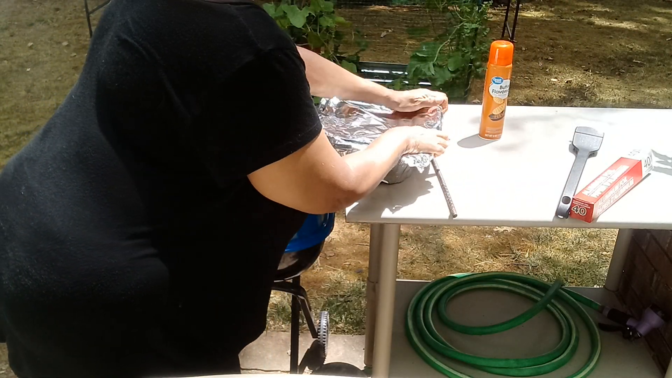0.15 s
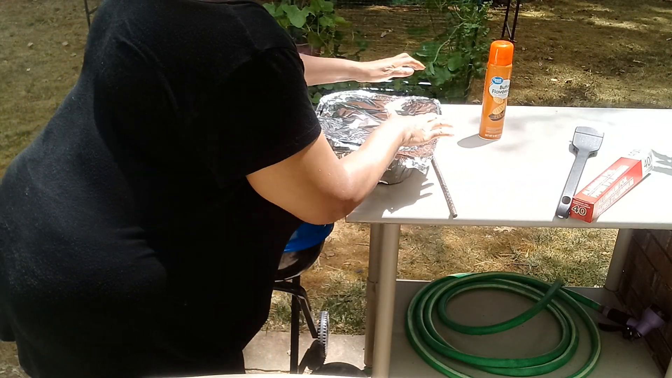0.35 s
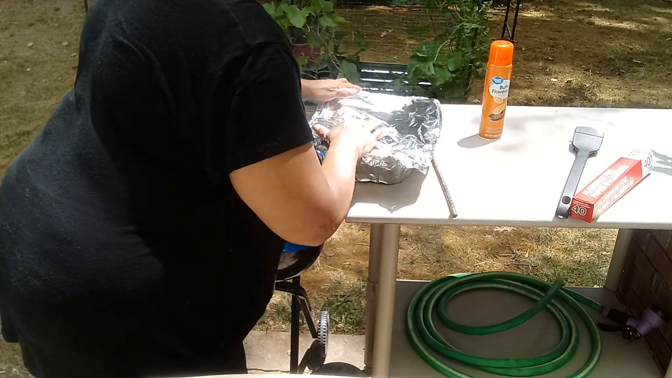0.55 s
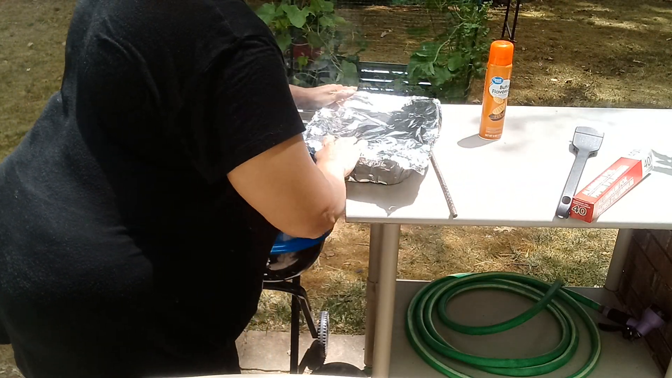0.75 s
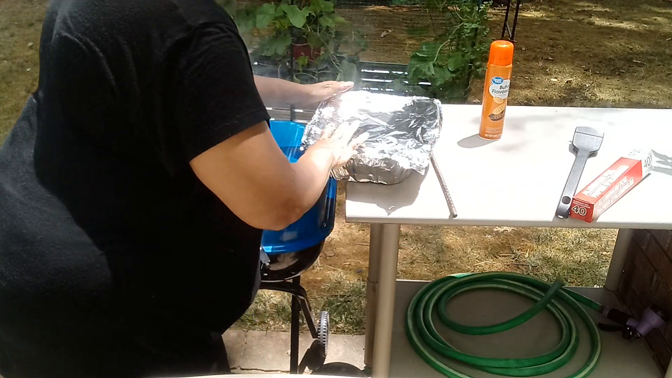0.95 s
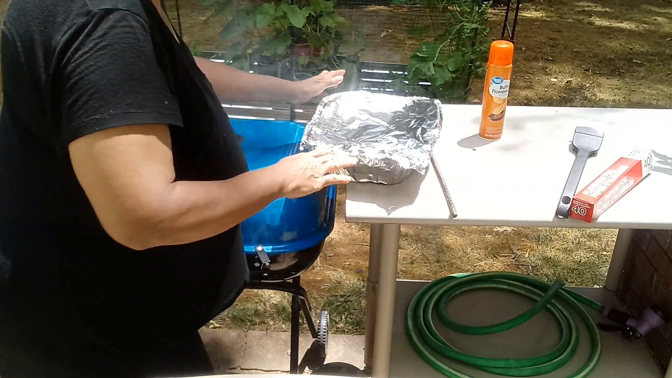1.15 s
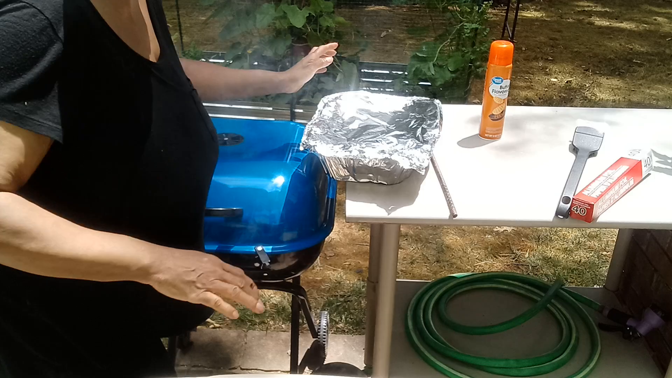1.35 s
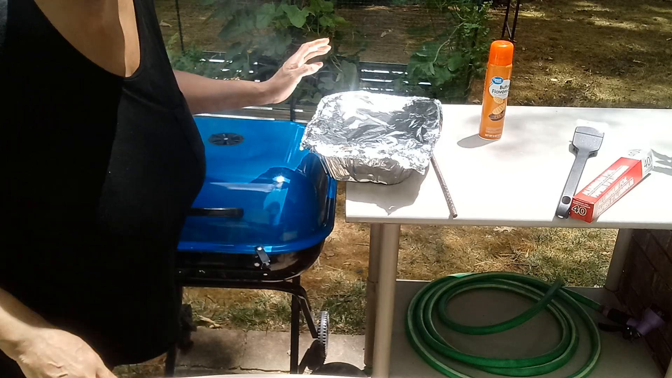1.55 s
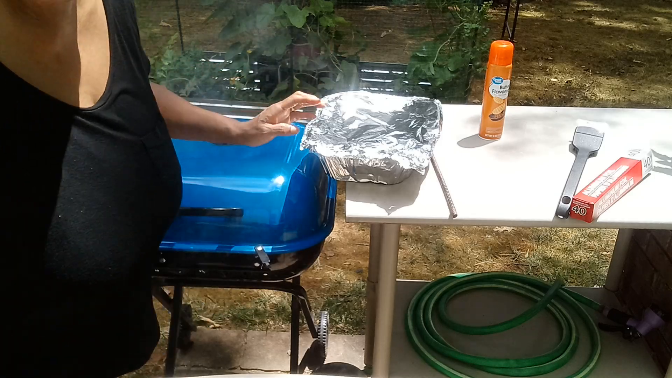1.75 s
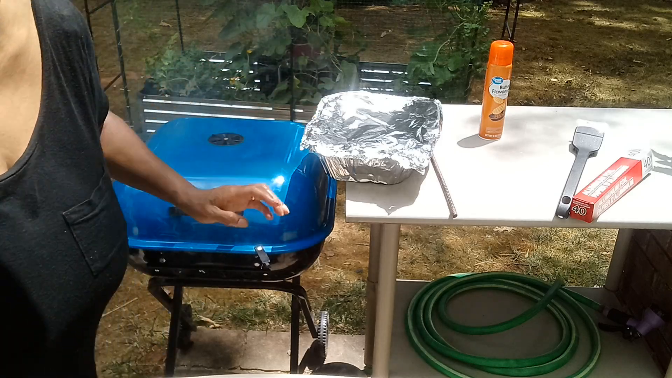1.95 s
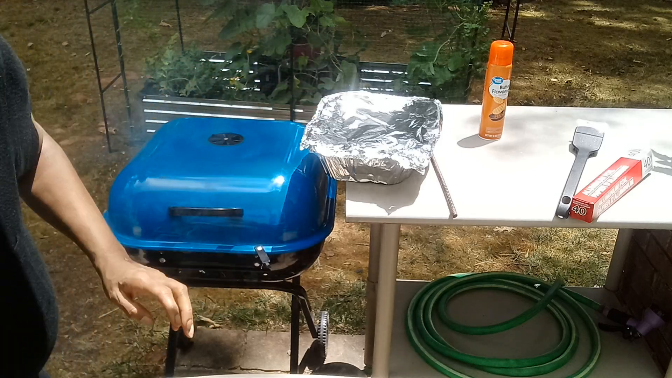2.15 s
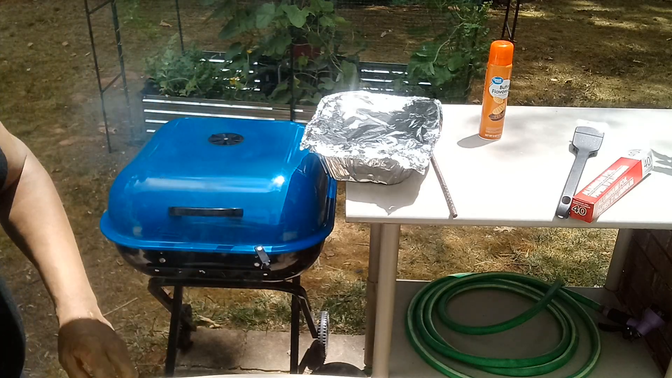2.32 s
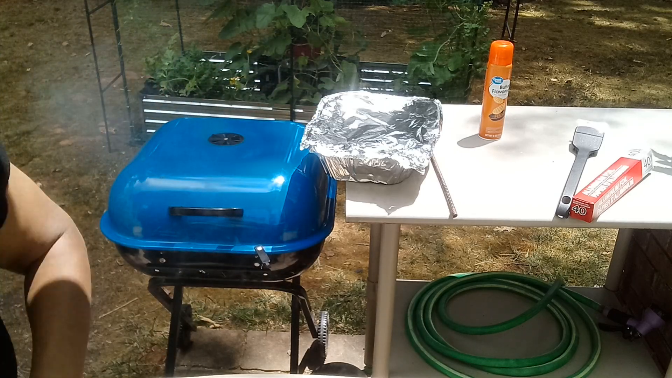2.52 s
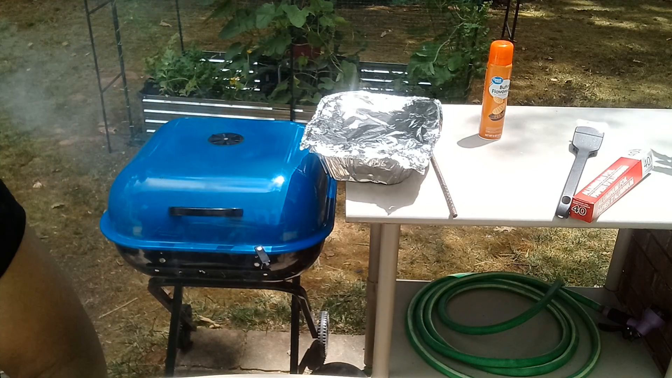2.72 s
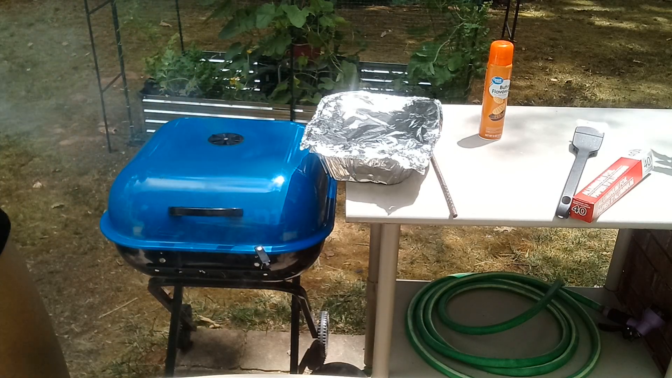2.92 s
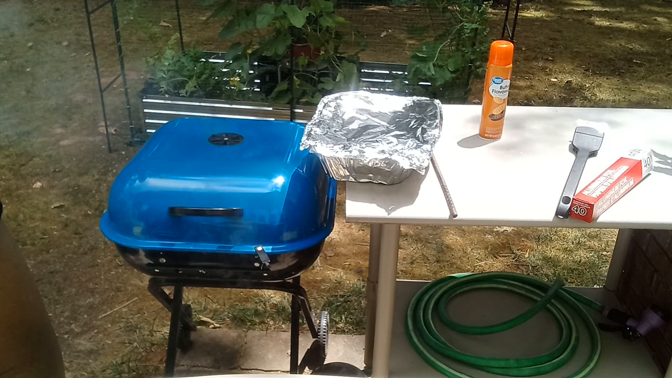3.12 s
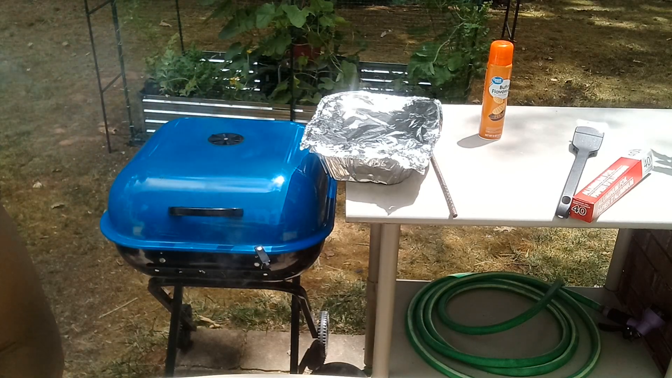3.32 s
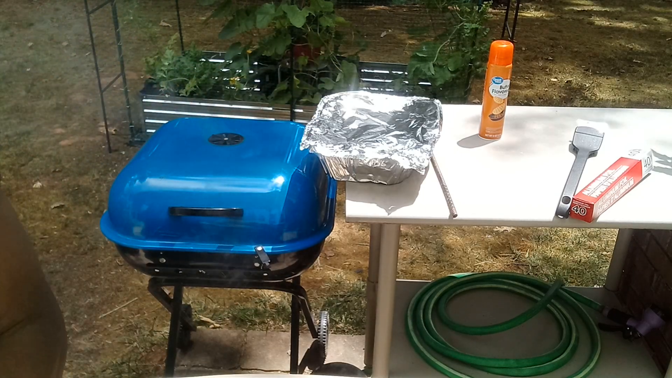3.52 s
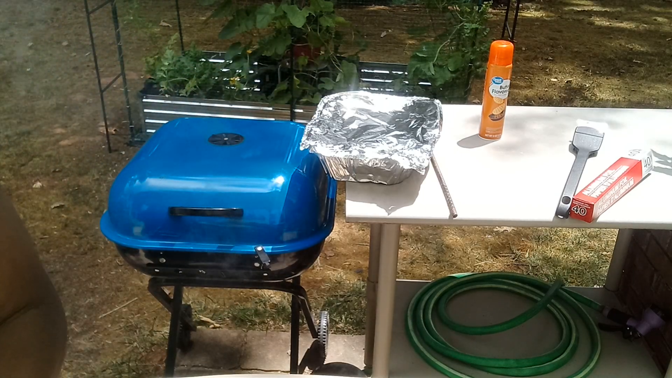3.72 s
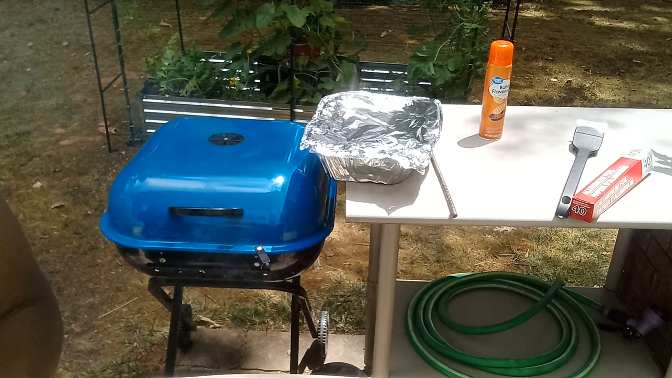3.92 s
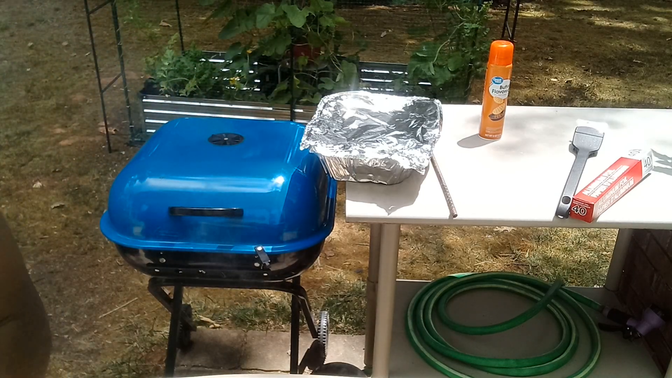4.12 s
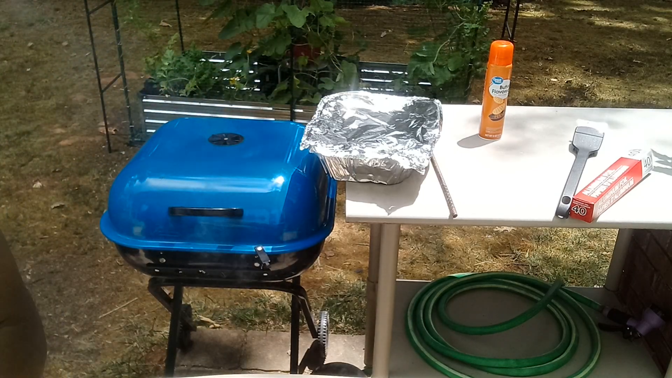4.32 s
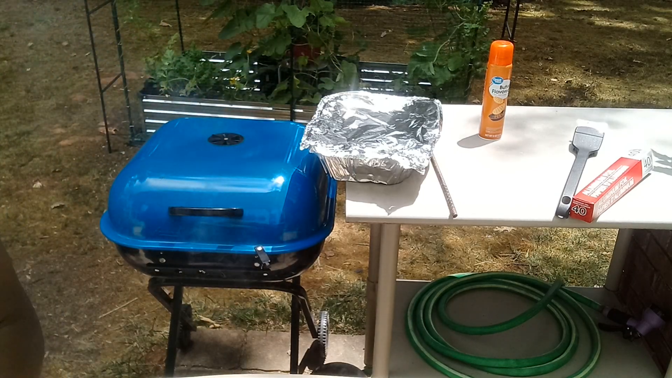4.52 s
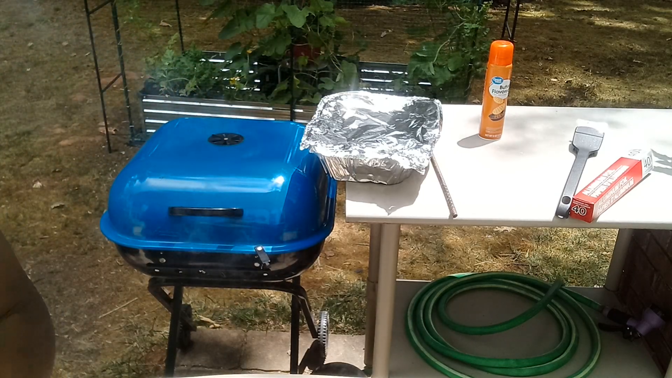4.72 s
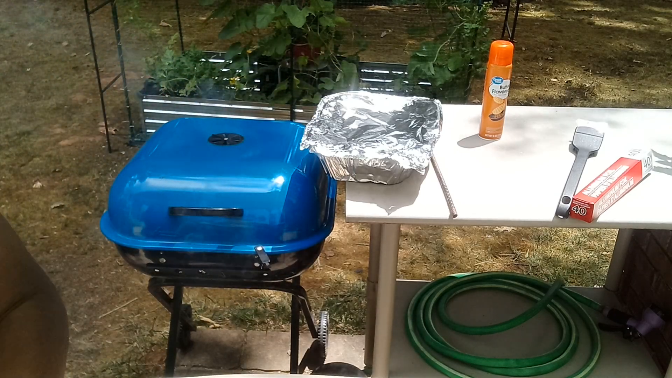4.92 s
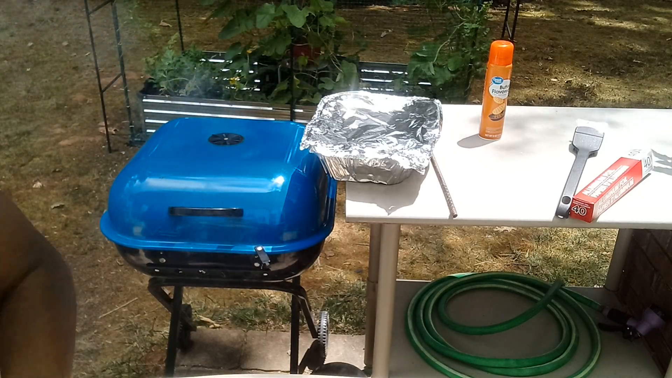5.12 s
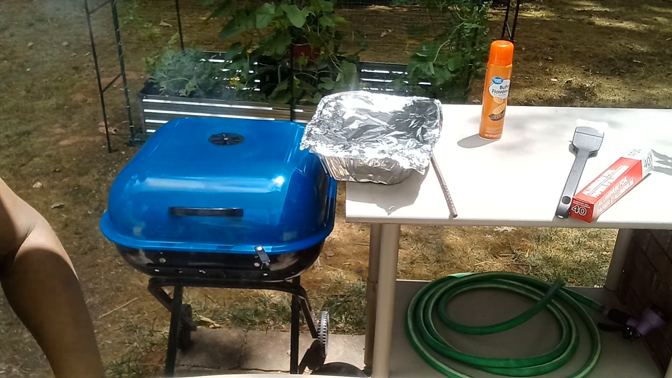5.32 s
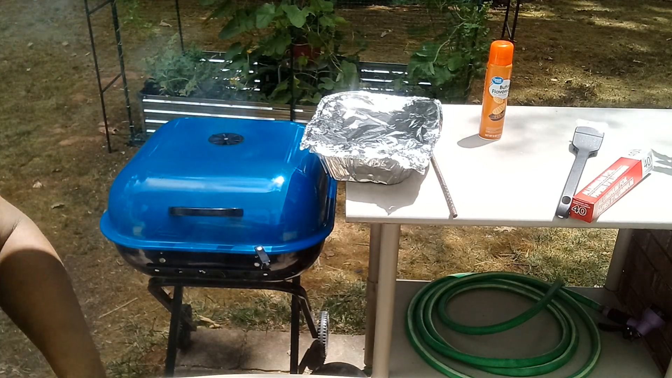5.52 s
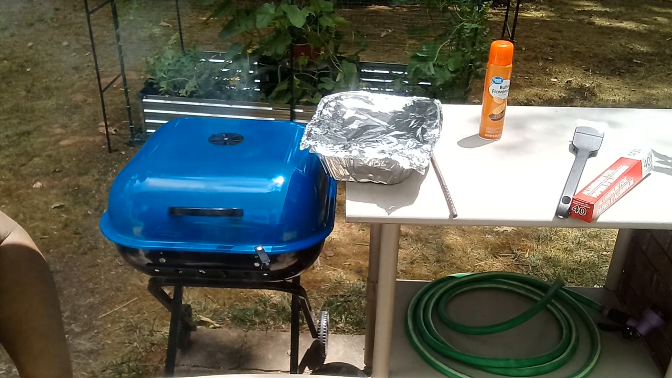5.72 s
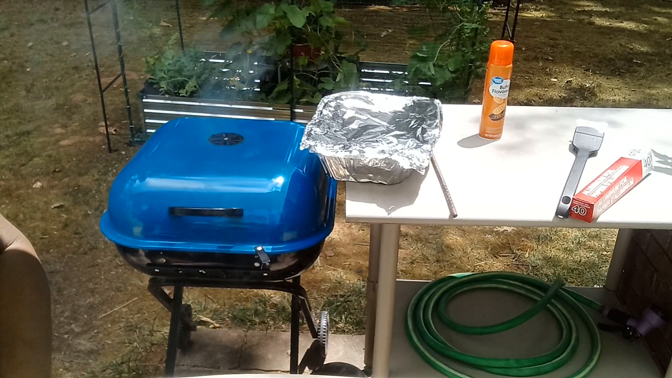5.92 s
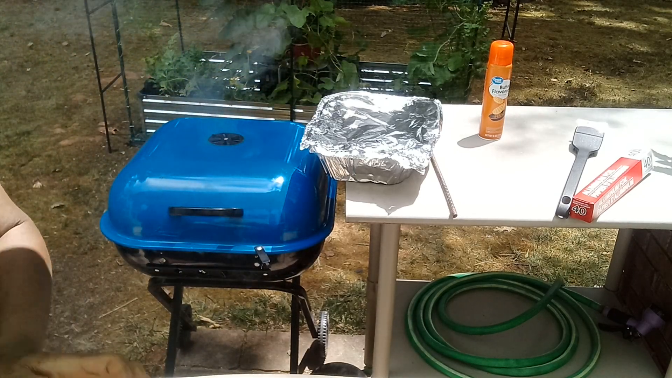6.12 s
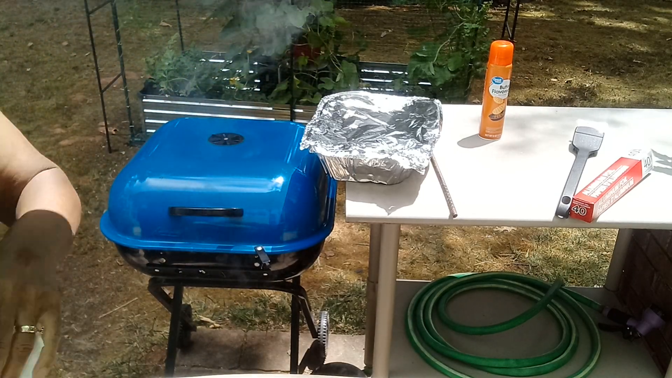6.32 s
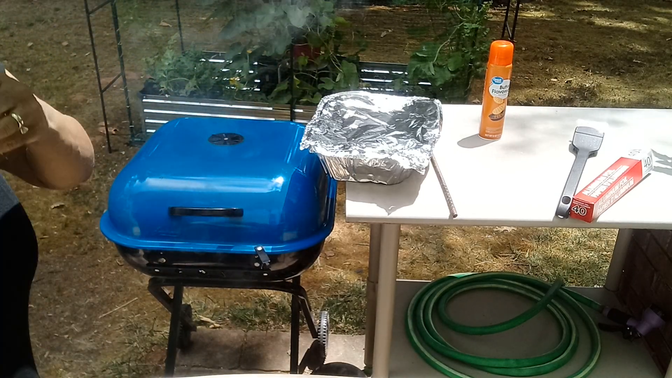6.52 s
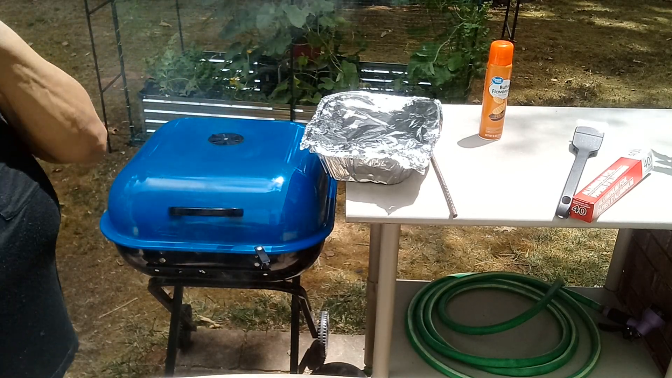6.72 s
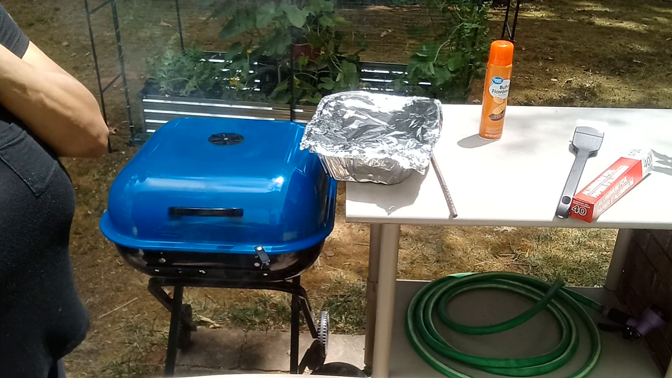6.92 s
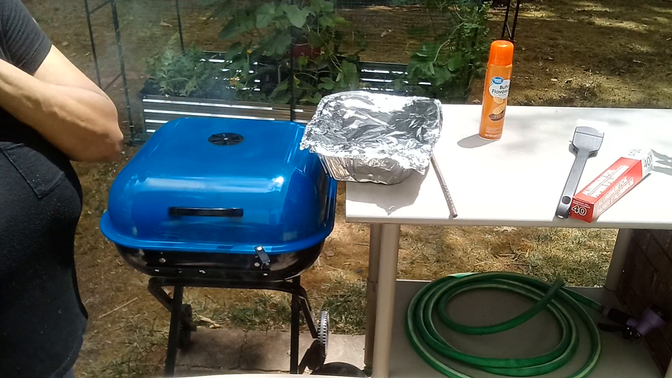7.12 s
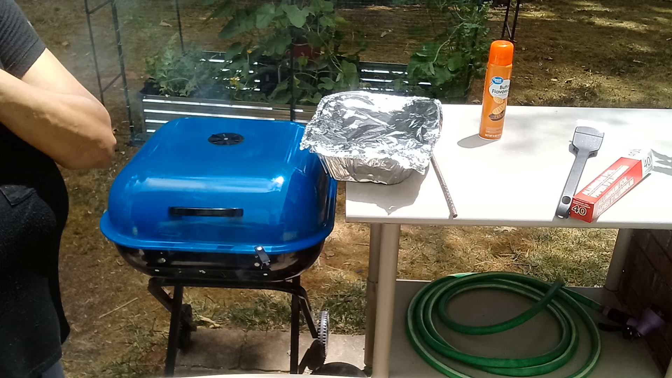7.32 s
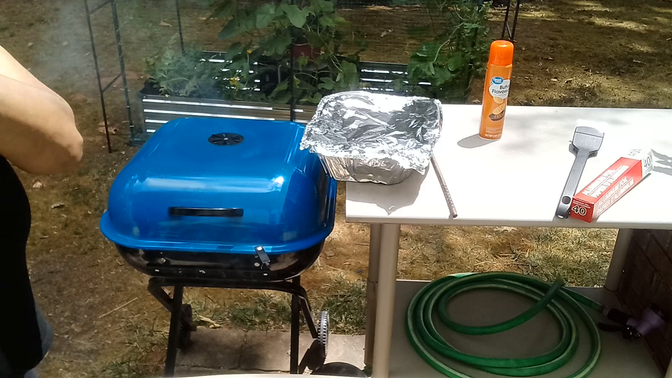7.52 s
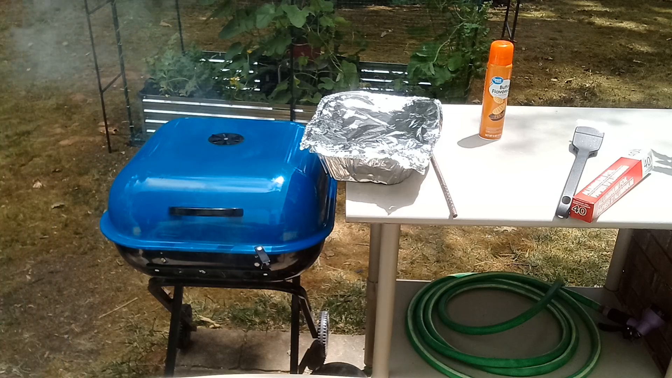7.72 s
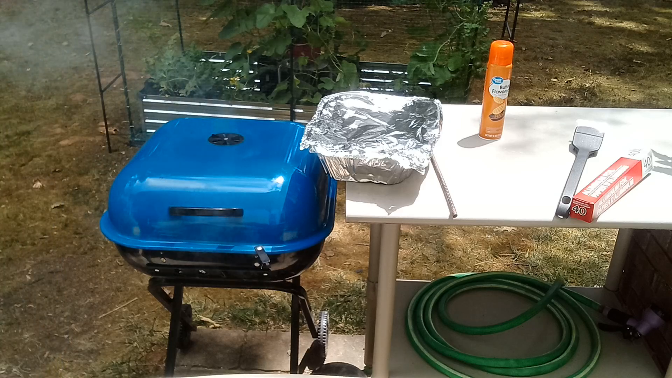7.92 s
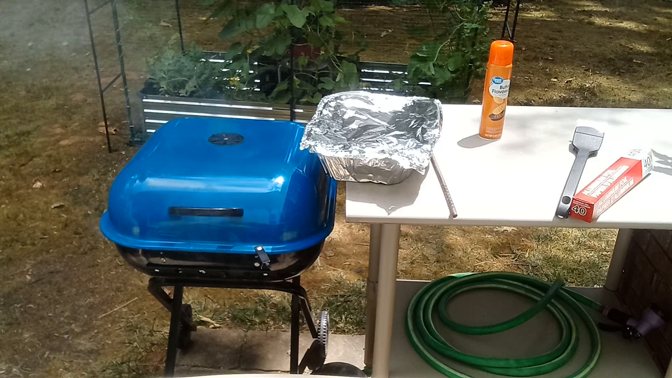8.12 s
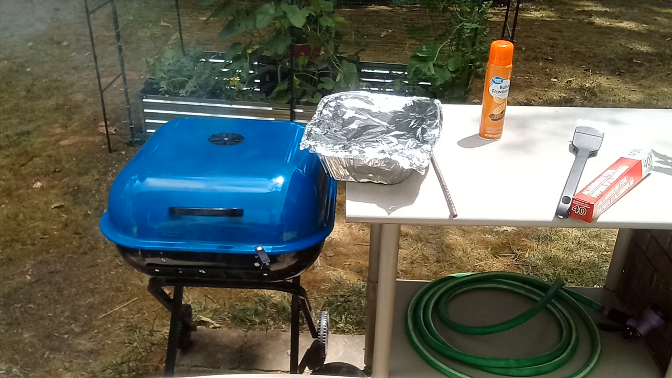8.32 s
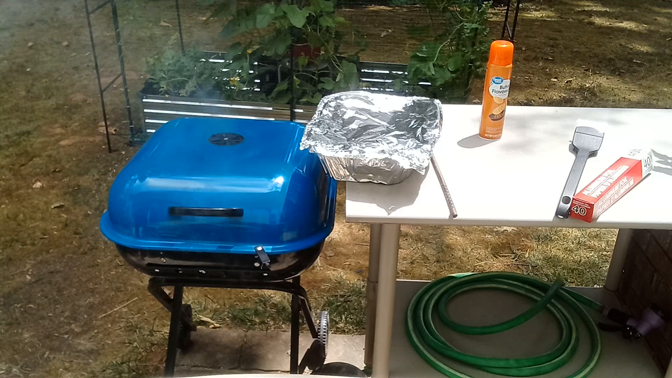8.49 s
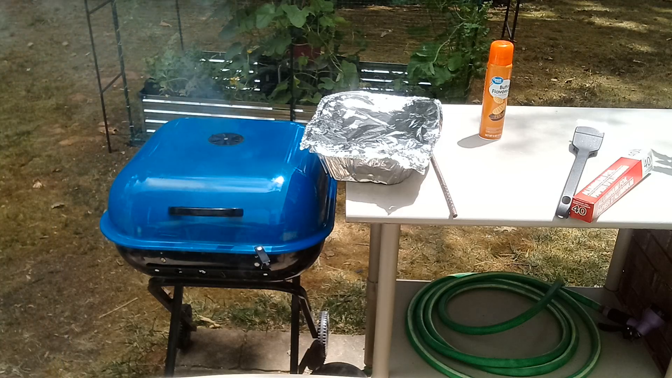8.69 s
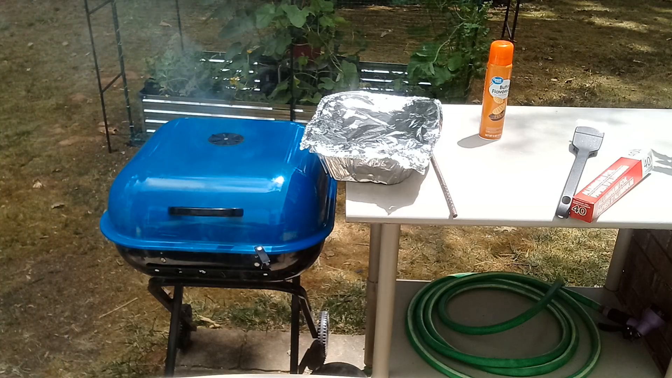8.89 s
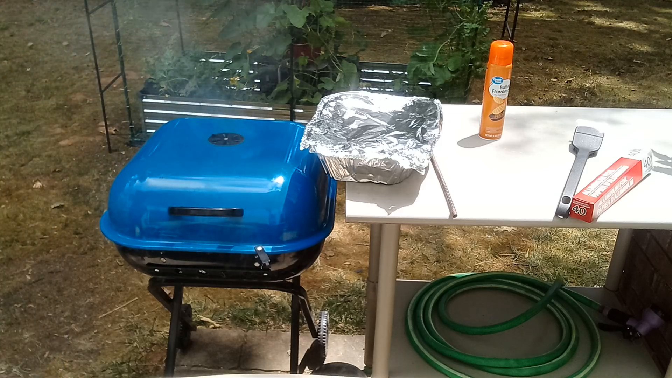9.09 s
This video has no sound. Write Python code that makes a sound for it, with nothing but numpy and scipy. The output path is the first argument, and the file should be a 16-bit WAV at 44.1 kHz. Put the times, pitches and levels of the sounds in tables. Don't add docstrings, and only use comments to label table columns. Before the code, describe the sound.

Thin foil crinkles brightly as it is crimped over a pan, then grassy rustling, clicks, a hollow clatter and faint bird twitter outdoors.

```python
import sys
import numpy as np
from scipy import signal
from scipy.fft import rfft, irfft, next_fast_len
from scipy.io import wavfile
from scipy.ndimage import uniform_filter1d, map_coordinates

SR = 44100
rng = np.random.default_rng(int(sys.argv[2]) if len(sys.argv) > 2 else 0)


def wrap_up_sound(samples):
    columns = np.atleast_2d(samples).T
    tamed = np.clip(columns, -1, 1)
    steps = np.round(tamed * 32767).astype(np.int16)
    wavfile.write(sys.argv[1], SR, steps)


def volts_from_decibels(level):
    exponent = np.asarray(level, float) / 20
    return 10 ** exponent


N = 403515


def unit(x):
    return x / np.sqrt(np.mean(x ** 2) + 1e-20)


def along(points, hz):
    f, v = np.transpose(points)
    return np.interp(np.log(hz + 1), np.log(f + 1), v)


def wobble(rate):
    t = np.arange(0, N / SR + .002, .001)
    smooth = map_coordinates(rng.standard_normal(1000), [t * rate])
    return np.interp(np.arange(N) / SR, t, smooth)


def filtered(x, response):
    m = next_fast_len(N + 8192)
    return irfft(rfft(x, m) * response(np.fft.rfftfreq(m, 1 / SR)), m)[..., :N]


# (frequency [Hz], share heard alike [0-1])
COHERENCE = [(60, .8), (300, .93), (900, .85), (2000, .55), (4000, .4), (9000, .2), (15000, .1)]


def ports(noise, spectrum, lag_s):
    m = next_fast_len(noise.shape[1] + 2048, real=True)
    hz = np.fft.rfftfreq(m, 1 / SR)
    alike = np.clip(along(COHERENCE, hz), 0, 1)
    late = np.exp(-1j * np.pi * hz * lag_s)
    z = rfft(noise, m) * volts_from_decibels(along(spectrum, hz))
    shared = np.sqrt(alike) * z[0] * [late, late.conj()]
    own = np.sqrt(1 - alike) * z[1:]
    return unit(irfft(shared + own, m)[:, :noise.shape[1]])


def buckling(per_s, spread_db, t60, clump_db):
    size_db = spread_db * np.minimum(rng.exponential(size=N), 4)
    starts = (rng.random(N) < per_s / SR) * volts_from_decibels(size_db + clump_db * wobble(40))
    decay = volts_from_decibels(-60 / t60 / SR)
    energy = signal.lfilter([1], [1, -decay ** 2], starts ** 2)
    return unit(np.sqrt(np.abs(energy)))


def crackle(envelope, spectrum, lag_s):
    return ports(envelope * rng.standard_normal((3, len(envelope))), spectrum, lag_s)


def strokes(table, light_heavy_db=(0, 0)):
    s, db, rise, fall, weight = np.transpose(table)[:, :, None]
    t = np.arange(0, N / SR + .002, .001)
    light, heavy = light_heavy_db
    slope_db = 20 * np.maximum((s - t) / rise, (t - s) / fall)
    level_db = db + light + (heavy - light) * weight - slope_db
    return np.interp(np.arange(N) / SR, t, volts_from_decibels(level_db.max(axis=0)))


def with_crack(table, crack_db):
    return [(*row, crack_db) for row in table]


def hits(table, t60, pan_db, lag_samples, side_modes_db=-7):
    out, t = np.zeros((2, N + SR)), np.arange(SR // 16) / SR
    chance = rng.standard_normal((len(table), 6))
    rise = 1 - np.exp(-t / .0004)
    for (s, db, hz, crack_db), (d1, d2, place, *level) in zip(table, chance):
        partials = hz * np.array([1, 1.3498 + 0.13693 * d1, 0.67242 + 0.06145 * d2])
        sizes = volts_from_decibels(np.array([0, side_modes_db, side_modes_db]) + 0.95 * np.array(level))
        life = t60 * np.sqrt(1000 / partials)
        modes = volts_from_decibels(-60 * t / life[:, None]) * np.sin(2 * np.pi * partials[:, None] * t)
        ring = sizes @ modes
        noise = rng.standard_normal((2, len(t) + 1))
        band = signal.butter(2, [0.624 * hz, min(3 * hz, 8000 + hz / 2)], "band", fs=SR)
        snap = volts_from_decibels(2.0 - 60 * t / 0.01362) * signal.lfilter(*band, noise[:, 1:])
        crack = volts_from_decibels(crack_db + 8.5 - 60 * t / 0.01656) * np.diff(noise)
        for side, sign in enumerate((1, -1)):
            start = round(s * SR + sign * lag_samples / 2)
            gain = volts_from_decibels(db + 2.0 + sign * (pan_db + 1.3 * place) / 2)
            out[side, start:][:len(t)] += gain * rise * (ring + snap[side] + crack[side])
    return out[:, :N]


def echoes(x, table):
    noise = rng.standard_normal((3, SR // 3))
    hz, t, z = signal.stft(noise[1:] + 0.4367 * noise[0], SR, nperseg=256)
    tail = signal.istft(z * volts_from_decibels(-60 * t / along(table, hz)[:, None]), SR, nperseg=256)[1]
    return signal.oaconvolve(np.atleast_2d(x), tail / np.linalg.norm(tail[0]), axes=1)[:, :N]


# (frequency [Hz], t60 [s])
YARD = [(200, .04), (2000, .07), (10000, .03)]


def yard_echoes(blows):
    return volts_from_decibels(-11) * echoes(blows, YARD)


# (time [s], rumble level [dB])
TRAFFIC = [(0.0, -64.5), (0.66, -61), (0.99, -67), (1.96, -62), (2.42, -61), (3.06, -62), (3.44, -69.5),
           (4.08, -58), (4.48, -65.5), (5.02, -61), (5.43, -64.5), (5.94, -63), (9.15, -67.5)]
# (frequency [Hz], density [dB per Hz])
ROAD = [(21, -27.5), (36, -10.5), (81, -2), (129, -12.5), (146, -21.5), (172, -18), (202, -21.5),
        (312, -25), (700, -52.5), (910, -72), (1540, -120)]
AIR = [(240, -34.5), (400, -4.5), (467, -7), (1070, -11.5), (1330, -13.5), (16000, -10.5)]


def background():
    traffic_s, traffic_db = np.transpose(TRAFFIC)
    level_db = np.interp(np.arange(N) / SR, traffic_s, traffic_db)
    swell = volts_from_decibels(level_db + 0.66 * wobble(7) + [[1.5], [-1.5]])
    road = swell * ports(rng.standard_normal((3, N)), ROAD, lag_s=0)
    hiss = unit(filtered(rng.standard_normal((2, N)), lambda hz: volts_from_decibels(along(AIR, hz))))
    return road + volts_from_decibels(-72 + 1.1 * wobble(3.8256)) * hiss


# (time [s], peak level [dB], pitch [Hz], length [s])
PHRASES = [(1.477, -53, 7900, .02), (1.526, -52, 7650, .016), (1.559, -50, 7350, .012),
           (1.592, -50, 7400, .012), (1.637, -51, 7400, .018), (1.658, -50, 7500, .026),
           (3.268, -51, 7800, .022), (3.317, -51, 7700, .012), (3.354, -50, 7700, .014),
           (3.393, -47, 7600, .012), (3.427, -50, 7450, .014), (3.939, -50, 7750, .018),
           (3.97, -49, 7500, .01), (4.003, -47, 7500, .016), (4.036, -50, 7100, .008),
           (4.088, -46, 7450, .02), (4.108, -47, 7450, .022), (4.154, -50, 7000, .008),
           (4.82, -49, 7700, .018), (4.845, -50, 7400, .016), (4.89, -46, 7450, .01),
           (7.079, -55, 7800, .012), (7.091, -51, 7300, .01), (7.143, -52, 7500, .012),
           (7.157, -55, 7300, .01), (7.171, -51, 7450, .022), (7.596, -49, 7800, .02),
           (7.66, -54, 7400, .02), (7.691, -51, 7400, .02), (7.799, -51, 7400, .028),
           (7.828, -52, 7150, .014), (7.85, -51, 7200, .016), (8.086, -54, 7400, .018),
           (8.112, -56, 7300, .022), (8.15, -53, 7450, .022), (8.183, -52, 7150, .016),
           (8.203, -56, 7150, .014), (8.787, -59, 7500, .02), (8.818, -59, 7400, .014),
           (8.859, -54, 7550, .01), (8.876, -58, 7400, .008), (8.891, -56, 7300, .016),
           (8.927, -57, 7250, .018), (8.957, -58, 7150, .026)]


def bird():
    upper_hz, upper_late_s, upper_db, upper_sag_per_s = 9080, .007, -6, 2.1
    warble_hz, warble_depth = 55, .03
    song, t = np.zeros(N + SR), np.arange(SR // 12) / SR
    late = np.maximum(t - upper_late_s, 0)
    for s, db, hz, length in PHRASES:
        upper, size = rng.standard_normal(2)
        flutter = unit(uniform_filter1d(rng.standard_normal((2, len(t))), size=90))
        jump = .25 * np.exp(-t / .0016)
        warble = warble_depth * np.cos(2 * np.pi * warble_hz * t + .6)
        low_hz = hz * (1 - jump - warble + .012 * flutter[0])
        high_start_hz = upper_hz + .7 * (hz - 7500) + 260 * upper
        high_hz = high_start_hz * (1 - upper_sag_per_s * late + .032 * flutter[1])
        low_env = (1 - np.exp(-t / .0023)) * np.exp(-(t / length) ** 4)
        high_env = (1 - np.exp(-late / .003)) * np.exp(-(late / (1.4 * length)) ** 2)
        low = low_env * np.sin(2 * np.pi * np.cumsum(low_hz) / SR)
        high = high_env * np.sin(2 * np.pi * np.cumsum(high_hz) / SR)
        song[round(s * SR):][:len(t)] += volts_from_decibels(db - 5.5) * (low + volts_from_decibels(upper_db + 1.5 * size) * high)
    return song[:N]


def bird_in_tree():
    song = bird()
    return song + volts_from_decibels(-2) * echoes(song, [(8000, .3)])


# (peak time [s], peak level [dB], rise [s per 20 dB], fall [s per 20 dB], weight [0-1])
GRASS = [(1.225, -76, .04, .2, .2), (1.3, -72, 0.015, .12, 0.6145), (1.62, -76, 0.472, 0.3691, 0.8849),
         (2.18, -58.5, 0.08938, 0.05767, 0.0467), (2.836, -64.5, 0.09516, 0.1672, 0.5483),
         (2.92, -65, 0.0943, 0.10873, 0.1728), (3.384, -59, 0.0097, 0.16, 0.482),
         (3.46, -63, 0.1699, 0.101, 0.392), (3.68, -64, 0.04095, .2, 0.1413),
         (4.03, -58.5, 0.1096, .5, 0.5597), (4.49, -60, 0.15655, .12, 0.6673),
         (4.6, -54.5, 0.10322, .25, 0.4767), (4.91, -53, 0.2838, .11, 0.4156),
         (5.4, -60, 0.2604, .3, 0.4966), (5.6, -70.5, 0.318, .3, 0.5694),
         (6.375, -53, 0.064, 0.6093, 0.5501), (6.5, -52, 0.2308, .3, 0.2908),
         (6.58, -54.5, 0.3076, .22, .3), (6.75, -56.5, 0.1197, 0.5818, 0.5327),
         (6.87, -54, 0.399, 0.27883, 0.3712), (7.18, -57, 0.1283, 0.1477, 0.322),
         (7.29, -56.5, 0.1001, 0.15605, 0.2186), (7.475, -55.5, 0.14576, 0.092, .05),
         (7.62, -65, 0.2236, .3, 0.3034), (7.73, -65.5, 0.1572, .12, .3)]
FAR_GRASS = [
    (1.97, -69, .2, .3, .05),
    (7.88, -66, 0.0598, 0.3868, 0.0925),
    (8.0, -59.5, 0.218, 0.13384, 0.1004),
    (8.258, -61.5, 0.06137, .1, .02),
    (8.38, -59.5, 0.1194, 0.16, .05),
    (8.51, -64, 0.1538, 0.1166, .15),
    (8.96, -69, 0.3, 0.3, 0.27),
]
HANDLING = [(2.405, -61.5, .008, .1, 0.5174), (2.455, -58, 0.065, 0.04538, 0.5618),
            (2.515, -62.5, .008, 0.16454, 0.2753), (3.03, -68.5, 0.1043, 0.0826, 0.2645),
            (3.15, -65.5, 0.0328, 0.2572, 0.5233), (3.235, -56, 0.10287, 0.05609, 0.3073),
            (3.56, -74.5, 0.3935, 0.1271, 0.8638), (3.77, -52.5, 0.1031, 0.12525, 0.6864),
            (3.92, -56.5, 0.082, 0.10714, 0.677), (4.225, -52, 0.02724, .3, .4),
            (4.325, -48, 0.07204, 0.03862, 0.8839), (4.72, -55, 0.04485, .4, 0.4046),
            (4.78, -53.5, 0.0397, 0.07054, 0.8721), (5.038, -55, 0.00389, 0.1163, 0.02004),
            (5.064, -32.5, 0.00293, .06, .5), (5.09, -39, 0.028, .08, 0.86295),
            (5.165, -47, .08, 0.034, 0.67), (5.767, -49.5, 0.016, 0.0747, 0.6557),
            (5.875, -55, 0.0696, 0.05939, 0.739), (6.085, -51, 0.10578, 0.07047, 0.514),
            (6.2, -61.5, 0.0613, 0.1014, 0.3014)]
# (frequency [Hz], density [dB per Hz])
RASP = [(1290, -20.5), (2200, -4.5), (3410, -5), (5180, -6), (6500, -15), (8450, -41.5), (14300, -120)]
FIZZ = [(3530, -13.5), (6000, -3), (12300, -3.5), (15100, -4), (16000, -21)]
HOLLOW = [(500, -47), (800, -10), (1150, -3.5), (1450, -3.5), (2100, -2.5), (2800, -32.5), (5000, -120)]
THUD = [(41, -37.5), (70, -4.5), (177, -10.5), (313, -3), (495, -6.5), (646, -4.5), (800, -10.5),
        (1040, -50), (1760, -120)]
DRY_LEAF = [(800, -40), (1400, -5), (2200, 0), (3000, -3), (4800, -2.5), (6500, -9), (9000, -35),
            (14300, -120)]


def rustle():
    def stirred(grass_db, handling_db, far_db=-40):
        near = strokes(GRASS, grass_db)
        far = volts_from_decibels(far_db) * strokes(FAR_GRASS, grass_db)
        return np.sqrt(near ** 2 + far ** 2 + strokes(HANDLING, handling_db) ** 2)

    grains = buckling(per_s=700, spread_db=2.5, t60=0.04, clump_db=1.5)
    rasp = stirred((0, 0), (0, 0)) * crackle(grains + 0.75, RASP, lag_s=0.00025)
    fizz = stirred((-3.5, -5.5), (-4, -8.5), far_db=-2) * crackle(grains + .5, FIZZ, lag_s=0.00024023)
    hollow = stirred((-10.5, -1.1024), (-9, 4)) * crackle(grains + .3, HOLLOW, lag_s=0.00021044)
    thud = stirred((-28, 1.5), (-20, 4)) * crackle(grains + 0.56, THUD, lag_s=0.00029)
    leaves = volts_from_decibels(-1.5) * strokes(FAR_GRASS) * crackle(grains + .4, DRY_LEAF, lag_s=0.00036)
    fizz = volts_from_decibels([[5.6], [4.4]]) * fizz
    hollow = volts_from_decibels([[-.6], [.6]]) * hollow
    thud = volts_from_decibels([[-1.1], [1.1]]) * thud
    return rasp + fizz + hollow + thud + leaves


# (time [s], peak level [dB], ring [Hz])
STEPS = [
    (3.745, -49.5, 273),
    (3.908, -51, 283.8),
    (5.789, -45, 123.5),
    (6.079, -55, 128.5),
    (6.698, -54.5, 292.9),
]


def steps():
    return hits(with_crack(STEPS, -40), t60=0.05033, pan_db=-1.5, lag_samples=9)


# (time [s], peak level [dB], ring [Hz])
TWIGS = [(6.175, -49, 4403), (6.322, -48, 1764), (7.163, -48.5, 3271), (7.459, -44, 3390),
         (7.598, -51, 4139), (7.726, -54, 3393), (7.848, -54, 4300), (7.862, -57, 2100), (8.009, -52, 2300),
         (8.046, -57, 2400), (8.243, -55, 4700), (8.251, -41, 2900), (8.316, -50, 2150), (8.322, -50, 4200),
         (8.384, -50.5, 3135), (8.419, -49.5, 2633), (8.494, -46, 2700), (9.037, -59.5, 3970)]


def twigs():
    return hits(with_crack(TWIGS, -21), t60=.024, pan_db=.8, lag_samples=15, side_modes_db=-10)


# (time [s], peak level [dB], ring [Hz], crack relative to peak [dB])
SNAPS = [(2.031, -62, 5500, -4), (2.141, -57, 5600, -10), (2.183, -50, 5100, -14), (2.1865, -44, 2900, -14),
         (2.374, -57, 1860, -30), (2.398, -47, 1950, -8), (2.445, -52, 5300, -12), (2.448, -52, 620, -30),
         (2.517, -45, 3100, -22), (2.831, -55, 4940, -15), (3.123, -56, 600, -14), (3.129, -54, 1017, -14),
         (3.228, -47, 3600, -16), (3.247, -50, 4500, -14), (3.382, -46, 3700, -14), (3.726, -51, 1200, -16),
         (3.736, -47, 690, -24), (3.775, -46, 930, -22), (3.894, -49, 920, -24), (4.04, -52, 1390, -16),
         (4.215, -49, 4592, -16), (4.2565, -41, 3100, -12), (4.2625, -41, 1179, -8),
         (4.3035, -40, 3409, -18), (4.3135, -39, 420, -26), (4.318, -33, 4000, -14), (4.32, -33, 400, -24),
         (4.714, -46, 4200, -26), (4.738, -45, 1000, -14), (4.742, -41, 4300, -16), (4.773, -44, 600, -14),
         (4.7805, -37, 3650, -14), (4.7815, -43, 1500, -30), (4.923, -48, 4330, -16),
         (5.036, -40, 3106, -16), (5.766, -27, 1700, -24), (5.773, -28, 1130, -26), (5.848, -43, 943, -21),
         (5.857, -46, 1400, -24), (5.869, -46, 1300, -24), (5.878, -46, 5000, -14), (6.01, -51, 1253, -24),
         (6.038, -44, 1300, -12), (6.056, -46, 1450, -14), (6.098, -48, 1700, -14), (6.121, -51, 1900, -20)]


def snaps():
    return hits(SNAPS, t60=0.021315, pan_db=1.0, lag_samples=9.7)


# (time [s], peak level [dB], ring [Hz])
BOX = [
    (2.4, -50, 1120),
    (2.517, -52, 1140),
    (2.518, -57, 2200),
    (3.149, -56, 950),
    (3.183, -57, 1150),
    (3.208, -57, 1150),
    (3.226, -50, 1000),
    (3.241, -52, 1100),
    (3.382, -51, 1100),
    (3.42, -60, 1100),
]


def box():
    touched = with_crack(BOX, -20)
    return volts_from_decibels(-4.5) * hits(touched, t60=.07, pan_db=-.6, lag_samples=10.2, side_modes_db=-16)


# (time [s], peak level [dB], ring [Hz])
RATTLE = [(5.0605, -34, 4800), (5.063, -24, 4183), (5.065, -30, 1050), (5.0745, -23.5, 1135),
          (5.076, -32, 4200), (5.082, -28, 1181), (5.087, -30, 360), (5.089, -25, 1263), (5.093, -31, 520),
          (5.095, -27, 1300), (5.103, -24, 1131), (5.113, -35, 3300), (5.119, -34, 1200),
          (5.1255, -27, 3229), (5.135, -31, 3077), (5.143, -36, 4392), (5.153, -35, 1300),
          (5.154, -39, 4400), (5.164, -36, 1212), (5.165, -38, 3000)]


def rattle():
    return hits(with_crack(RATTLE, -22.5), t60=0.031, pan_db=-1.0, lag_samples=10.5, side_modes_db=-15.5)


# (time [s], peak level [dB], ring [Hz], crack relative to peak [dB])
KNOCKS = [(.2885, -37, 956, -19), (.2945, -31, 1377, -15), (.298, -35, 560, -24), (.3025, -37, 380, -20),
          (.3055, -39, 1450, -20), (.309, -35, 440, -14), (.317, -40, 330, -24), (.33, -34, 1400, -14),
          (.332, -41, 286, -24), (.342, -42, 470, -24), (.3585, -37, 1429, -10), (.367, -43, 258, -28),
          (.641, -46, 980, -4), (.7495, -46, 1300, -12), (.751, -49, 275, -17), (.779, -52, 291, -12)]


def pan_knocks():
    return hits(KNOCKS, t60=0.02596, pan_db=6.5, lag_samples=-2.5)


# (time [s], peak level [dB], ring [Hz])
CREASES = [(.0025, -37, 11000), (.02, -38, 11000), (.074, -39, 12000), (.0795, -36, 12000),
           (.2195, -44, 11000), (.257, -50, 11000), (.672, -43, 12000), (.679, -38, 12000),
           (.702, -42, 11000), (.7075, -43, 12000), (.813, -55, 4600), (.8387, -54, 9000),
           (.87, -60, 12000), (.9315, -59, 12000), (1.006, -57, 12000), (1.2972, -61, 12000)]


def loud_creases():
    return hits(with_crack(CREASES, -1.5), t60=.012, pan_db=7, lag_samples=-3.6)


# (from [s], to [s], low [Hz], high [Hz], gain [dB])
GROUND_DIP = (2.76, 3.63, 1450, 2900, -5)


def shifting_resonances(x, depth_db):
    hz, t, z = signal.stft(x, SR, nperseg=512)
    field = uniform_filter1d(rng.standard_normal(z.shape[1:]), size=7, axis=0)
    field = uniform_filter1d(field, size=9, axis=1)
    start, end, low_hz, high_hz, dip_db = GROUND_DIP
    dip = np.outer((hz > low_hz) & (hz < high_hz), (t > start) & (t < end))
    gain = volts_from_decibels(depth_db * unit(field) + dip_db * dip)
    return signal.istft(z * gain, nperseg=512)[1][:, :N]


# (peak time [s], peak level [dB], rise [s per 20 dB], fall [s per 20 dB], weight [0-1])
PRESSES = [(0.004, -29.5, 0.8286, 0.1282, 0.03), (.095, -34, 0.8146, 0.1233, 0.05),
           (.225, -41, 1.5, 0.1034, .02), (.27, -48, 1.7424, 0.1309, 0.09),
           (.305, -40.5, 0.0089, 0.0868, 0.86), (.345, -53, 0.0855, 0.0665, 1), (.589, -54, .004, .3, .2),
           (.635, -47.5, 0.0301, 0.1057, 0.36), (.677, -36, 0.045, 0.11, 0.08),
           (.705, -37.5, 0.11, 0.045, 0.11), (.755, -51, 0.0434, 0.1035, 0.77),
           (.805, -50, 0.0706, 0.0271, .25), (.86, -59, .21, .35, .2), (.95, -64, .07, .11, 0.75),
           (.987, -56, .006, .12, 0.07)]
# (frequency [Hz], density [dB per Hz])
CRINKLE = [(3240, -13.5), (5500, -4), (6180, -8), (6670, -5), (8560, -1.5), (12400, 2), (16000, -3)]
SHEET = [(710, -8), (1200, -8.5), (1720, -1.5), (2050, -5), (3990, 0), (6500, -6.5), (8450, -33),
         (14300, -120)]
BOOM = [(71, -45.5), (120, 3), (405, -18.5), (474, 2.5), (538, -15), (857, -13.5), (1500, -3), (1950, -41),
        (3300, -120)]


def foil():
    n = round(1.3 * SR)
    creases = buckling(per_s=9000, spread_db=4, t60=.006, clump_db=.6)[:n]
    bright = strokes(PRESSES)[:n] * crackle(creases, CRINKLE, lag_s=-0.0000832)
    body = strokes(PRESSES, (-13, 4))[:n] * crackle(creases, SHEET, lag_s=-0.0000877)
    boom = strokes(PRESSES, (-29, 6.5))[:n] * crackle(creases + .6, BOOM, lag_s=-0.0001921)
    crimped = volts_from_decibels([[3.5], [-3.5]]) * bright + volts_from_decibels([[1.6], [-1.6]]) * body + volts_from_decibels([[1.1], [-1.1]]) * boom
    return np.pad(crimped, ((0, 0), (0, N - n)))


def scene():
    blows = steps() + twigs() + snaps() + box() + rattle() + pan_knocks() + loud_creases()
    rubbed = shifting_resonances(foil() + rustle(), depth_db=1.8012)
    return background() + bird_in_tree() + yard_echoes(blows) + blows + rubbed


def low_pass(x):
    return signal.sosfilt(signal.butter(12, 17030, fs=SR, output="sos"), x)


def record(dry):
    mix = filtered(dry, lambda hz: (hz < 15900) / (1 + (33 / (hz + 1)) ** 4))
    return low_pass(mix)


dry = scene()
out = record(dry)
wrap_up_sound(out)
```